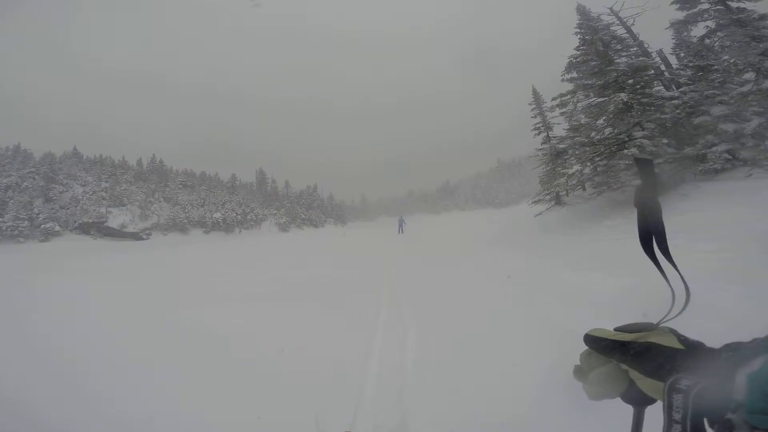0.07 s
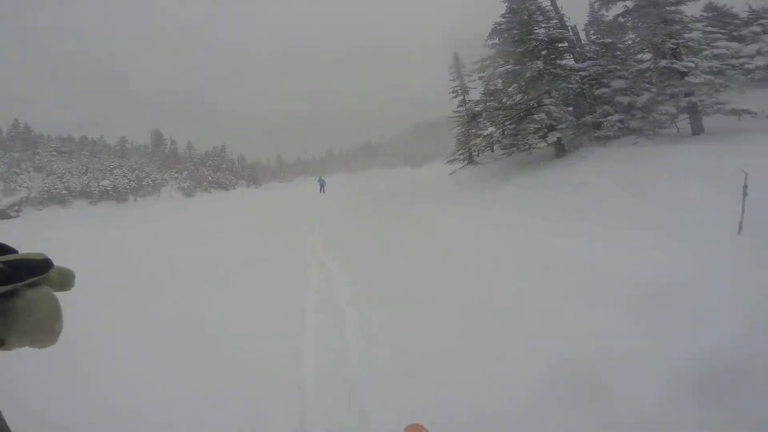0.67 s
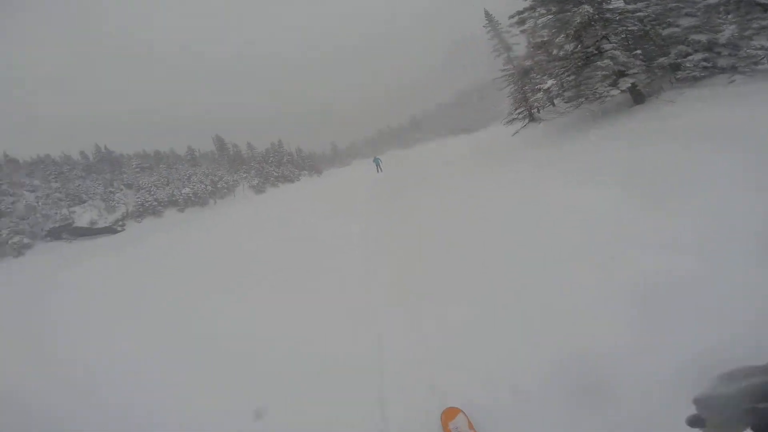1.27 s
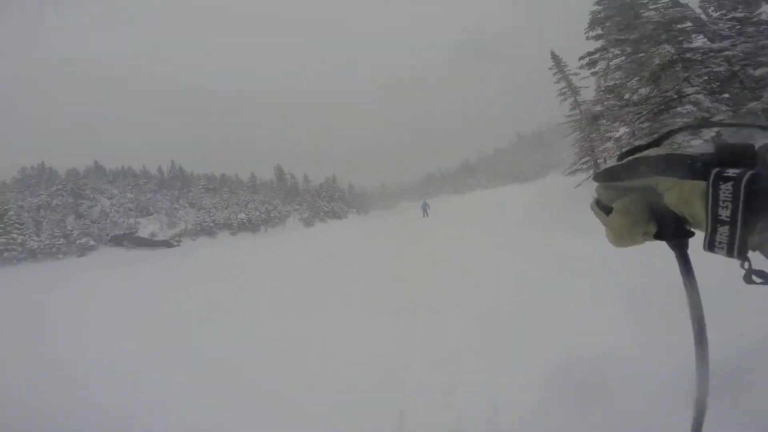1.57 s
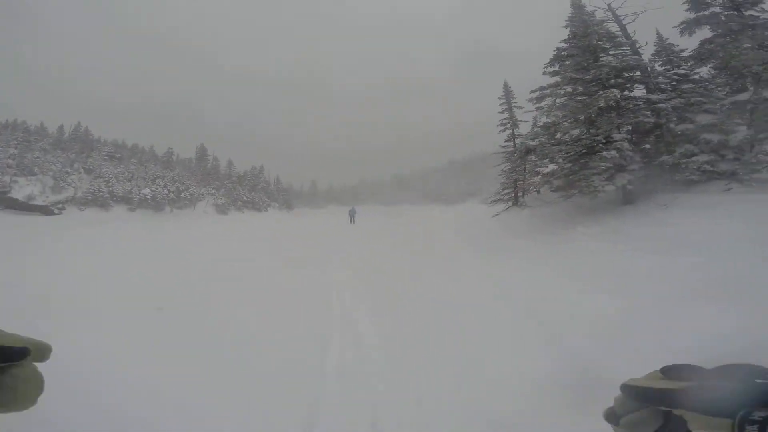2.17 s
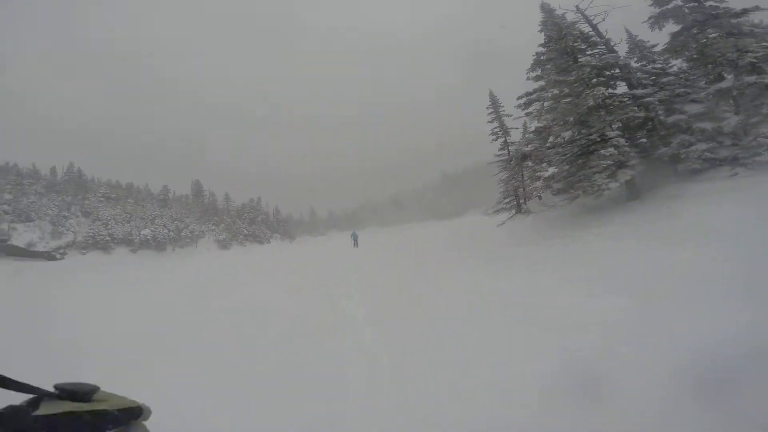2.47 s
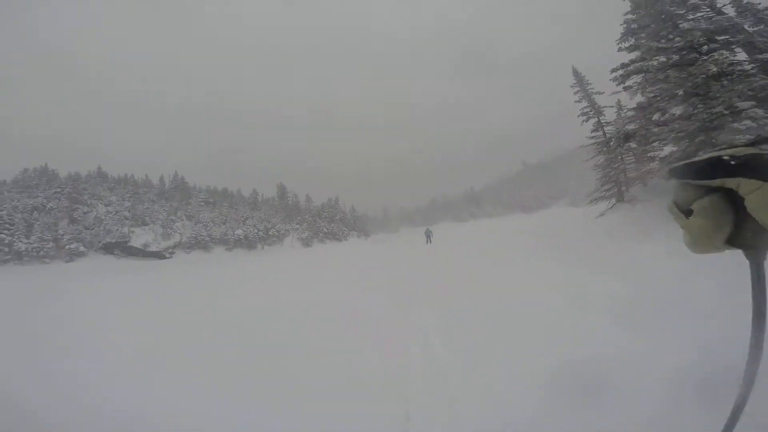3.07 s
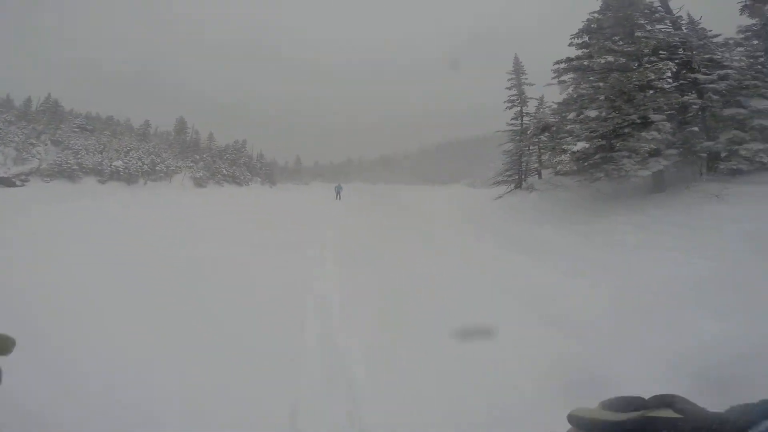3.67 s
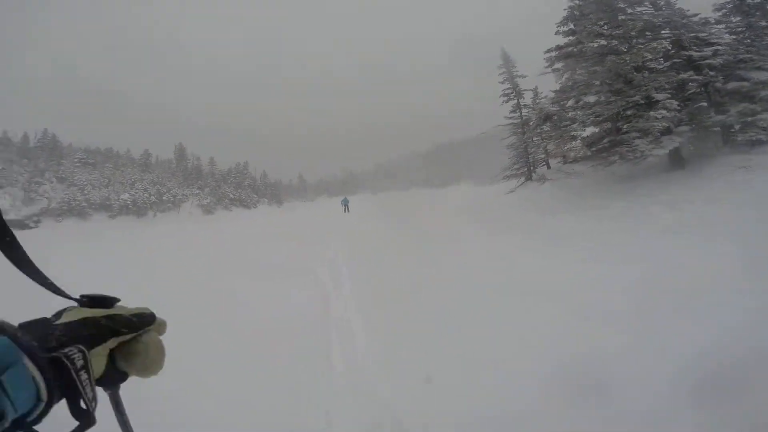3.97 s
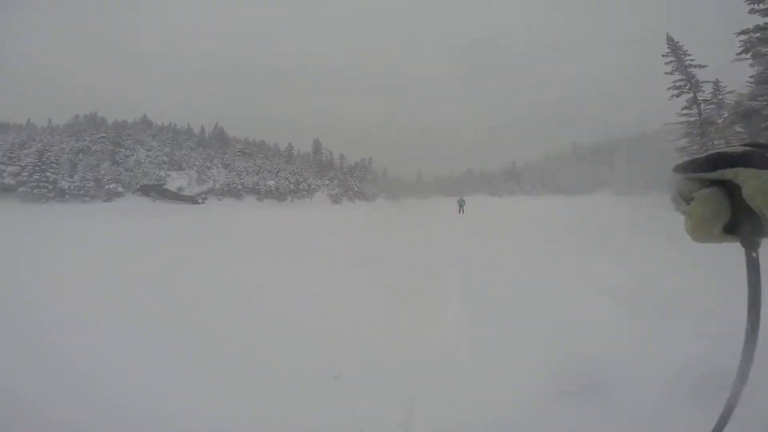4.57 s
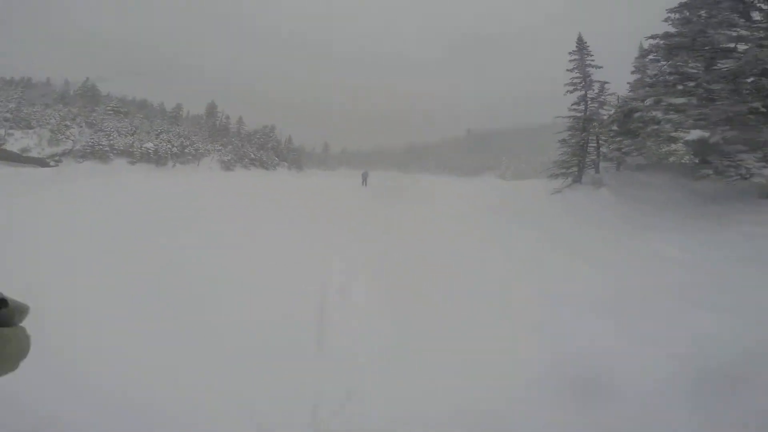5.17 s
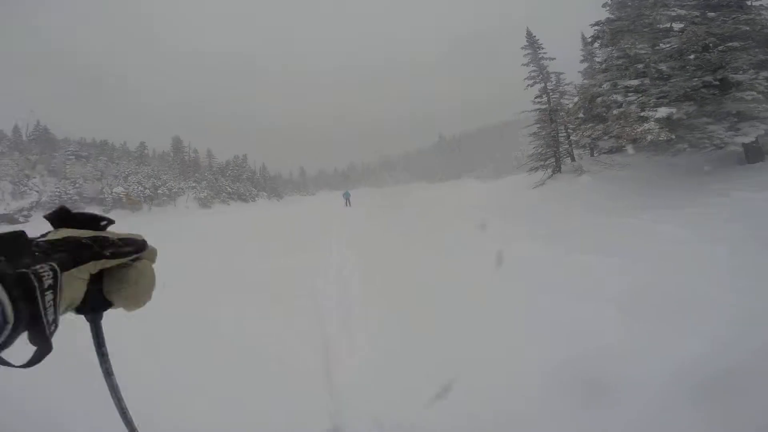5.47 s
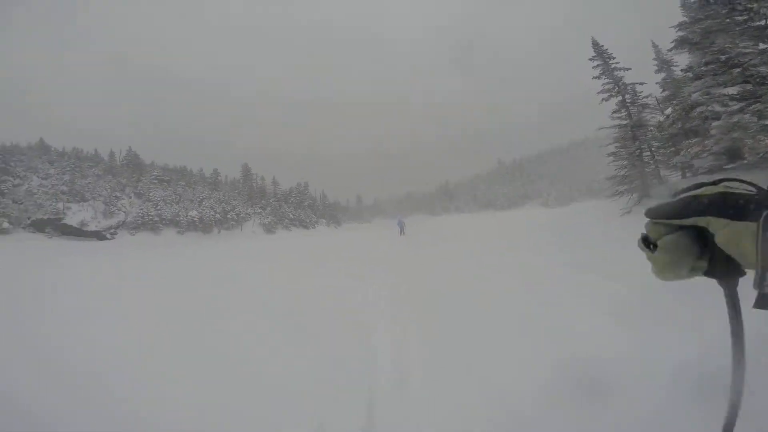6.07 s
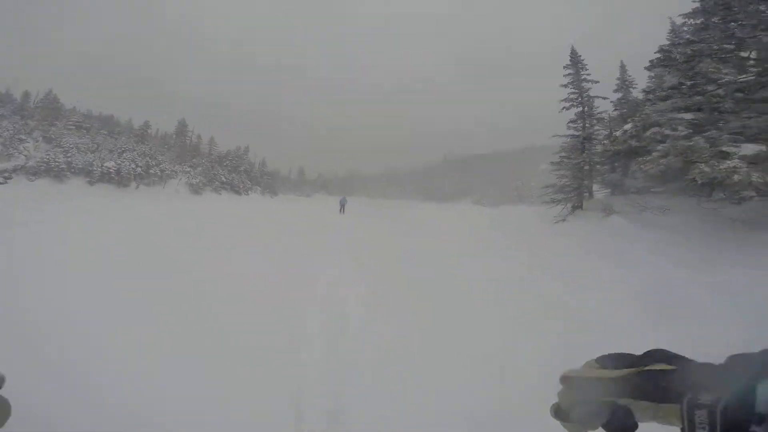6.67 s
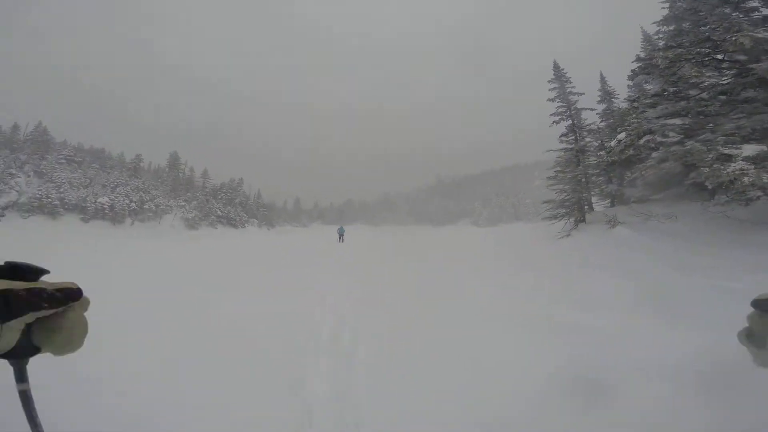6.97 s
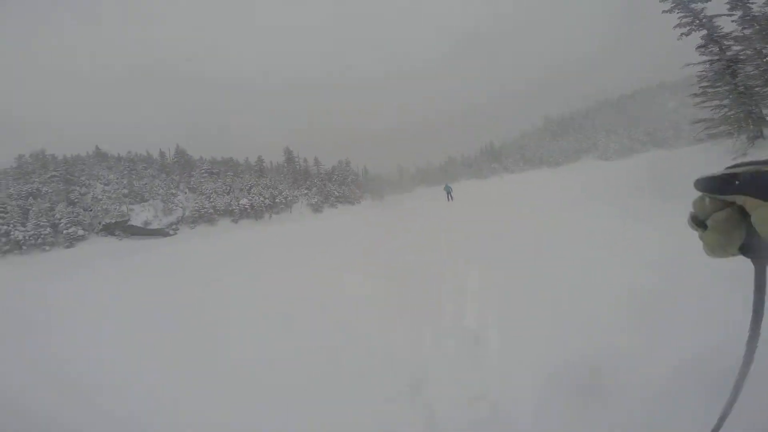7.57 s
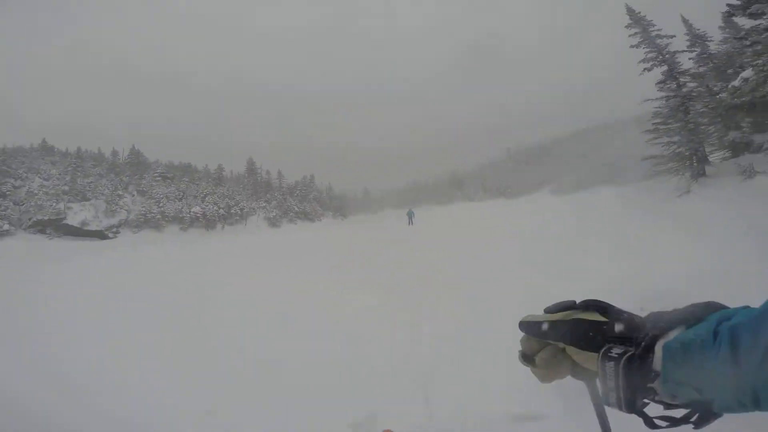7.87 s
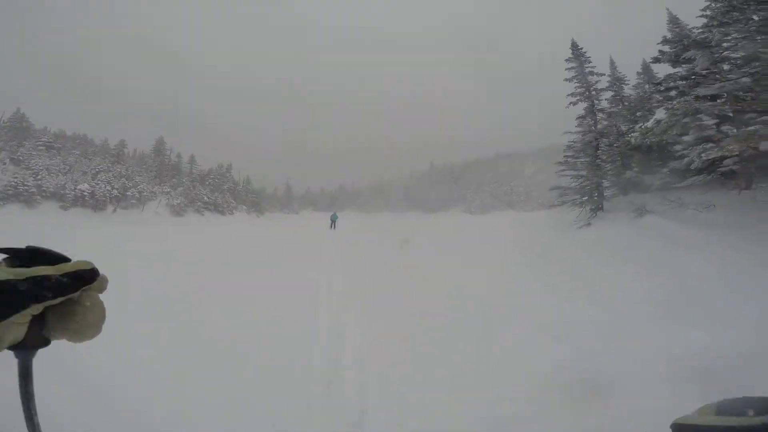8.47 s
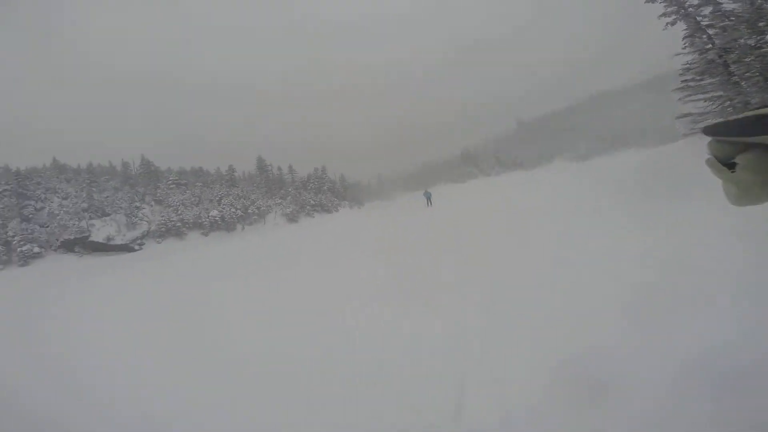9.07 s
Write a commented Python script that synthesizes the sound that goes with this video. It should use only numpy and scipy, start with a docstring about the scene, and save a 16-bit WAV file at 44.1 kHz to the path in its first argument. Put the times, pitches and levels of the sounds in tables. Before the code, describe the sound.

Quiet, rhythmic crunches and scrapes of skis and poles on snow come a little more than once a second, with occasional brief creaks. The microphone sits inside a plastic case on the skier, so gusty low wind and dull bumps from the mount follow the movement. Sharp little ticks of ice and a fine patter of snow hit the shell, growing denser and louder after about halfway.

```python
"""On a snowy slope, a skier strides uphill, heard from a body-worn camera in a closed plastic case.
Each stride loads a ski, crunches the snow and shakes the camera mount; push-offs scrape, packed snow
creaks and a breeze rumbles on the case. Icy flakes tick against the shell and patter in flurries,
more thickly in the second half. Under it all lie a soft hiss of air and a faint electronic whine."""
import sys
import numpy as np
from scipy import signal
from scipy.fft import rfft, irfft, next_fast_len
from scipy.io import wavfile
from scipy.ndimage import uniform_filter1d

SR = 44100
rng = np.random.default_rng(int(sys.argv[2]) if len(sys.argv) > 2 else 0)


def bounce(signal):
    """Save signal as a 16-bit WAV file at the path given by the first command-line argument."""
    frames = np.transpose(np.atleast_2d(signal))
    limited = np.clip(frames, -1, 1)
    pcm = np.round(limited * 32767).astype(np.int16)
    wavfile.write(sys.argv[1], SR, pcm)


N = 411012

# The tones of the mount's soft bounce and of the case's hollow knock: pitch_hz, fade_s, relative_db
BOUNCE_TONES = [(111.6, 0.069, 12.5), (58, 0.05, -15), (150, 0.016, -37)]
KNOCK_TONES = [(312, 0.025, -7), (384, 0.019, 11.5), (762, 0.019, 6.5), (1212, 0.047, -4.5),
               (1850, 0.036, -8)]
# Strides, each loading a ski and shaking the body: start_s, length_s, crunch_db, rumble_db
STRIDES = [(0.04, 0.387, -53.5, -51.5), (0.945, 0.31, -54, -51.5), (1.672, 0.51, -52, -51.5),
           (2.374, 0.41, -57.5, -55), (3.158, 0.46, -51, -51), (3.954, 0.3, -57, -47.5),
           (4.688, 0.38, -49, -48.5), (5.533, 0.17, -48.5, -45.5), (6.102, 0.16, -49, -55),
           (6.358, 0.6, -54, -52.5), (7.025, 0.62, -52.5, -51.5), (7.665, 0.26, -52, -49),
           (8.054, 0.25, -54.5, -50.5), (8.47, 0.33, -53.5, -51), (8.801, 0.19, -54.5, -77),
           (9.18, 0.15, -60.5, -52.5)]
LIGHT_SNOW_DB = -69.5  # strength of the snowfall between flurries


def undb(db):
    """Turn decibels into a number to multiply a sound by."""
    return 10 ** (np.asarray(db) / 20)


def unit(x):
    """Scale a signal to an average (rms) level of 1."""
    return x / np.sqrt(np.mean(x ** 2) + 1e-20)


def even(x, span_s):
    """Hold the level near 1 over each span_s, keeping the quicker flickers."""
    return x / np.sqrt(np.abs(uniform_filter1d(x ** 2, int(span_s * SR))) + 1e-20)


def curve(rows):
    """Join (time_s, value) points with straight lines."""
    return np.interp(np.arange(N) / SR, *np.transpose(rows))


def swell(start_s, hold_s, rise_s, fall_s):
    """A gain that rises to 1 by start_s, holds and falls."""
    return curve([(start_s - rise_s, 0), (start_s, 1), (start_s + hold_s, 1),
                  (start_s + hold_s + fall_s, 0)])


def wander(per_s):
    """A random drift of about 1 either way, heading for per_s new values a second."""
    targets = rng.standard_normal(8192)
    return unit(np.interp(np.arange(N) / SR * per_s, np.arange(len(targets)), targets))


def colour(x, outline):
    """Shape bass and treble to a (pitch_hz, relative_db) outline; clicks keep their sharp start."""
    size = next_fast_len(N + 8192, True)
    hz, db = np.transpose(outline)
    bin_hz = np.maximum(np.arange(size // 2 + 1) * SR / size, 1)
    gains = undb(np.interp(np.log(bin_hz), np.log(hz), db))
    cepstrum = irfft(np.log(gains), size)
    # fold the filter so that nothing rings ahead of a click
    cepstrum[1:size // 2] *= 2
    cepstrum[size // 2 + 1:] = 0
    return irfft(rfft(x, size) * np.exp(rfft(cepstrum)), size)[:N]


def fade(t, fade_s):
    """Die away by 60 dB in fade_s seconds."""
    return np.exp(-np.log(1000) * t / fade_s)


def ring(t, hz, fade_s):
    """One tone that dies away after a hit."""
    return np.sin(2 * np.pi * hz * t) * fade(t, fade_s)


def struck(t, tones, retune=1):
    """A struck object rings with all its tones at once."""
    return sum(undb(db) * ring(t, hz * retune, fade_s) for hz, fade_s, db in tones)


def rough_hit(t, roughness, fade_s):
    """One sharp push with a dying tail of noise."""
    return (t == 0) + roughness * rng.standard_normal(len(t)) * fade(t, fade_s)


def at_level(sound, db, first_s=0.005):
    """Scale a short sound so that its opening has the given level."""
    return sound / sound[:int(first_s * SR)].std() * undb(db)


def add(out, start_s, sound):
    """Mix a sound in at start_s."""
    i = max(int(start_s * SR), 0)
    out[i:i + len(sound)] += sound[:max(N - i, 0)]


def grains(per_s, spread_db, cap):
    """Random clicks, many small and a few large, spanning spread_db times cap in size."""
    hit = rng.random(N) < per_s / SR
    size = undb(spread_db * np.minimum(rng.exponential(size=N), cap))
    return unit(hit * size * rng.choice([-1, 1], N) / np.sqrt(per_s))


def through_case(x, share):
    """The plastic case rings along with a sound passing through it."""
    # Where the case rings: pitch_hz, width_hz, relative_db
    case_tones = [(802, 112, 4.5), (1233, 90, 3), (1680, 73, 1), (1920, 130, -3), (2360, 48, 3),
                  (2870, 890, 1), (3690, 140, 3.5), (5300, 540, -11)]
    ringing = sum(undb(db) * signal.lfilter(*signal.iirpeak(hz, hz / width_hz, SR), x)
                  for hz, width_hz, db in case_tones)
    return x + share * ringing


def ski_pressure(glide_db=-57, uneven_db=1.3):
    """How loud the crunch is: a light glide, each stride's weight and the push-offs, on uneven snow."""
    # A ski or pole scrapes harder until it lets go: peak_s, rise_s, level_db
    push_offs = [(0.1, 0.015, -46), (0.23, 0.096, -42.5), (0.67, 0.073, -49), (1.1, 0.024, -49),
                 (1.22, 0.072, -55), (1.52, 0.14, -58), (1.82, 0.032, -45), (2.03, 0.14, -49),
                 (2.6, 0.056, -49), (2.701, 0.058, -38), (3.27, 0.04, -49), (3.36, 0.036, -45),
                 (3.48, 0.046, -44), (4.14, 0.041, -44.5), (4.23, 0.23, -46.5), (4.58, 0.1, -51),
                 (5.33, 0.044, -58), (5.84, 0.1, -55), (5.999, 0.087, -47), (6.43, 0.06, -43),
                 (6.6, 0.044, -44), (6.7, 0.03, -47.5), (7.281, 0.1, -41), (7.401, 0.017, -36.5),
                 (7.59, 0.04, -45.5), (7.75, 0.021, -38), (7.96, 0.13, -45.5), (8.06, 0.045, -47.5),
                 (8.19, 0.036, -43.5), (8.48, 0.033, -61), (8.66, 0.04, -46), (8.81, 0.04, -52)]
    power = undb(glide_db) ** 2
    for start_s, length_s, db, _ in STRIDES:
        power += (undb(db) * swell(start_s, length_s, rise_s=0.089, fall_s=0.026)) ** 2
    for peak_s, rise_s, db in push_offs:
        power += (undb(db) * swell(peak_s, 0, rise_s, fall_s=0.058)) ** 2
    return np.sqrt(power) * undb(uneven_db * wander(per_s=14))


def snow_crunch(grains_per_s=2200, slips_per_s=48, gain_db=-0.04):
    """Snow gives way in sudden slips, each a dying spray of crystals, over the smooth rub of the ski."""
    dying = fade(np.arange(SR // 20) / SR, fade_s=0.035)
    # The tone of crushed snow: pitch_hz, relative_db
    snow_outline = [(300, -7.5), (600, -4), (1020, -8), (1400, -1), (1900, 2), (2500, -1), (3300, -10),
                    (4100, -11.5), (4800, -21.5), (7000, -23), (15000, -42.5)]
    sprays = 0
    for hz in (1300, 1820, 2600, 3300):
        slips = signal.fftconvolve(np.abs(grains(slips_per_s, spread_db=6, cap=2.73)), dying)[:N]
        sprays += signal.lfilter(*signal.iirpeak(hz, 2, SR), slips * rng.standard_normal(N))
    breaking = grains(grains_per_s, spread_db=3, cap=5.9)
    rub = 0.42 * rng.standard_normal(N)
    snow = unit(colour(breaking + rub, snow_outline)) + unit(colour(sprays, snow_outline))
    return even(through_case(snow, share=1), span_s=0.24) * ski_pressure() * undb(gain_db)


def snowfall_db(patchy_db=1.24):
    """How strongly it snows: a thin, patchy fall with flurries on top."""
    # Flurries of fine snow reaching the case: start_s, length_s, strength_db
    flurries = [(1.478, 0.08, -65), (1.921, 0.12, -62), (3.329, 0.2, -65.5), (4.795, 0.3, -55.5),
                (5.663, 0.034, -59), (5.961, 0.05, -62), (6.079, 0.054, -59), (6.476, 0.35, -58.5),
                (6.888, 0.18, -64.5), (7.26, 0.1, -50), (7.388, 0.07, -47.5), (7.519, 0.13, -50),
                (7.73, 0.06, -47.5), (7.926, 0.33, -56.5), (8.358, 0.14, -57), (8.649, 0.16, -58.5),
                (8.97, 0.12, -58.5)]
    power = undb(LIGHT_SNOW_DB) ** 2
    for start_s, length_s, db in flurries:
        power += (undb(db) * swell(start_s, length_s, rise_s=0.06, fall_s=0.07)) ** 2
    return 10 * np.log10(power) + patchy_db * wander(per_s=12)


def flake_patter(base_per_s=55, base_db=-72, thicken=0.52, vary_db=26, gain_db=2):
    """Small flakes patter on the case over a hiss of powder; thicker snow is denser and louder."""
    # The tone of the patter: pitch_hz, relative_db
    patter_outline = [(700, -10), (1500, 1), (2700, 8), (4200, 9.5), (5400, 2), (6500, 6.5), (8600, 5.5),
                      (11000, 1), (13000, 0.5), (15000, -4)]
    strength_db = snowfall_db()
    flakes_per_s = base_per_s * undb(thicken * (strength_db - base_db))
    flakes = np.abs(grains(flakes_per_s, spread_db=2, cap=3.5))
    dying = fade(np.arange(SR // 100) / SR, fade_s=0.0089)
    patter = 0
    for hz in (2900, 4200, 4980, 7540, 11450, 12600):
        # each flake shatters with its own mix of pitches
        bursts = signal.fftconvolve(flakes * undb(-vary_db * rng.random(N)), dying)[:N]
        patter += signal.lfilter(*signal.iirpeak(hz, hz / 1900, SR), bursts * rng.standard_normal(N))
    powder = 0.46 * rng.standard_normal(N)
    snow = colour(unit(patter) + powder, patter_outline)
    return unit(through_case(snow, share=0.1)) * undb(strength_db + gain_db)


def rumble_strength(settle_db=6.5, gust_db=1.8):
    """How loud the rumble is: the body shakes as a stride begins, then settles, over a gusty breeze."""
    # The breeze on the case: time_s, strength_db
    breeze = [(0, -65), (0.55, -54), (0.8, -53.5), (1.3, -61), (1.55, -56), (2.2, -62), (3.0, -58.5),
              (3.75, -57), (4.5, -54.5), (5.8, -55.5), (6.3, -51.5), (8.3, -53), (9.32, -53)]
    power = undb(curve(breeze)) ** 2
    for start_s, length_s, _, db in STRIDES:
        easing_db = curve([(start_s, settle_db / 2), (start_s + length_s, -settle_db / 2)])
        shake = swell(start_s, 0.82 * length_s, rise_s=0.07, fall_s=0.1)
        power += (undb(db + easing_db) * shake) ** 2
    return np.sqrt(power) * undb(gust_db * wander(per_s=9))


def wind_and_body_rumble(bumps_per_s=45, hollow_db=-5, gain_db=-1):
    """Air buffets the case, and the moving body shakes the mount in many small bumps."""
    # The deep tone of wind on the case: pitch_hz, relative_db
    wind_outline = [(12, -34), (22, 5.5), (45, -8), (75, -1.5), (115, -4), (165, -8), (240, -11),
                    (370, -13.5), (540, -21), (800, -28.5), (1500, -51.5)]
    t = np.arange(SR // 8) / SR
    mount = struck(t, BOUNCE_TONES) + undb(hollow_db) * struck(t, KNOCK_TONES)
    bumps = signal.fftconvolve(grains(bumps_per_s, spread_db=9, cap=2.63), mount)[:N]
    wind = through_case(colour(rng.standard_normal(N), wind_outline), share=0.67)
    return even(unit(wind) + unit(bumps), span_s=0.11) * rumble_strength() * undb(gain_db)


def soft_air(level_db=-62):
    """A faint breeze sways a low murmur and a thin hiss."""
    # The tone of the air: pitch_hz, relative_db
    air_outline = [(12, -17), (25, 13.5), (60, 17.5), (130, 6.5), (250, -7), (1000, 1), (2000, -1.5),
                   (4000, -4), (6000, -8), (11000, -16.5), (15000, -14)]
    return unit(colour(rng.standard_normal(N), air_outline)) * undb(level_db + wander(per_s=6.4))


def camera_whine(pitch_hz=14625, level_db=-83):
    """The camera's electronics give one very soft, high tone."""
    return undb(level_db) * np.sin(2 * np.pi * pitch_hz * np.arange(N) / SR)


def small_ice_grains(count=30, wall_hz=2400, base_db=(-54, -65, -65), spread_db=2):
    """Rows of faint random hits for ice_ticks, more frequent and harder where the snow is thick."""
    lift_db = 0.56 * (snowfall_db() - LIGHT_SNOW_DB)
    fallen = np.cumsum(undb(lift_db))
    starts = np.searchsorted(fallen, fallen[-1] * rng.random(count))
    chance = rng.standard_normal((count, 4))
    pitches_hz = wall_hz * np.exp(0.36 * chance[:, 0])
    levels_db = np.array(base_db) + lift_db[starts, None] + spread_db * chance[:, 1:]
    return np.column_stack([starts / SR, pitches_hz, levels_db]).tolist()


def ice_ticks(shell_hz=5250, hollow_db=-34, wall_gain_db=-1):
    """An ice grain cracks and crumbles on the case; the wall it hits and the stiff shell ring briefly."""
    # The larger grains: start_s, wall_pitch_hz, wall_db, shell_db, crack_db
    large_grains = [(0.039, 2300, -46, -61, -61), (0.32, 2100, -60, -61, -58), (0.517, 2400, -60, -64, -59),
                    (1.0042, 1920, -44, -67, -62), (1.3135, 2290, -48, -53, -60),
                    (1.3235, 2720, -52, -52, -48.5), (1.3505, 1920, -42.5, -50, -47),
                    (1.4701, 2060, -49, -53, -47), (1.6414, 2220, -66, -56, -52),
                    (1.9186, 2096, -42.5, -52, -51), (1.9463, 2190, -44.5, -42, -45),
                    (2.0265, 2200, -45, -52, -45), (2.0425, 2170, -60, -56, -43),
                    (2.0905, 2300, -62, -58, -52), (2.1444, 2080, -55, -54, -54),
                    (2.353, 2400, -49, -61, -58), (2.3684, 2580, -42, -39.5, -66),
                    (2.4674, 2460, -47, -42.5, -70), (2.8503, 1870, -49, -56, -49),
                    (2.948, 3500, -36.5, -45, -62), (3.0387, 2600, -52, -56, -57),
                    (3.119, 2090, -56, -54, -59), (3.2417, 2260, -43.5, -69, -61),
                    (3.342, 1800, -40, -51, -51), (3.3725, 2200, -65, -50, -54),
                    (3.7543, 2890, -61, -58, -50), (4.296, 2630, -68, -58, -58),
                    (4.4709, 2430, -44, -59, -83), (4.6033, 2370, -40, -56, -59),
                    (4.667, 1800, -56, -44, -44), (4.6967, 2540, -44, -55, -49),
                    (4.8843, 2630, -35, -40.5, -42.5), (4.9972, 2650, -60, -43, -40.5),
                    (5.0443, 2300, -38.5, -44, -41.5), (5.065, 2330, -45, -41.5, -46),
                    (5.0987, 2750, -43, -47, -44.5), (5.3487, 2600, -44.5, -54, -47),
                    (5.6126, 2600, -38, -49, -45), (5.725, 2340, -39.5, -38, -57),
                    (5.7353, 2670, -37, -41, -42.5), (5.8583, 2430, -44, -48, -46.5),
                    (5.9477, 2640, -41.5, -53, -50), (6.0634, 2770, -43, -50, -45),
                    (6.0895, 2000, -42.5, -55, -45), (6.1098, 2770, -44.5, -53, -47),
                    (6.2443, 2220, -25.5, -47, -42), (6.4914, 3100, -39, -48, -49),
                    (6.5536, 2820, -40, -49, -45.5), (6.6135, 2090, -32, -33.5, -37),
                    (6.654, 2780, -37, -55, -55), (6.6729, 2240, -41, -47, -42.5),
                    (6.8184, 2570, -42, -50, -50), (7.1643, 2650, -35.5, -36, -39),
                    (7.2123, 2510, -39, -47, -47.5), (7.2689, 2480, -38, -48, -66),
                    (7.2965, 2570, -46, -42.5, -66), (7.3736, 2040, -34.5, -60, -65),
                    (7.3879, 2000, -39, -48, -51), (7.4018, 2570, -30, -46, -52),
                    (7.5331, 2840, -31.5, -44, -45), (7.5425, 2680, -38, -50, -53),
                    (7.549, 2080, -37.5, -49, -57), (7.6637, 2160, -43.5, -60, -57),
                    (7.7105, 2340, -41, -49.5, -54), (7.7504, 2120, -43, -51, -45.5),
                    (7.8545, 2460, -41, -46, -41.5), (8.089, 2980, -42.5, -50.5, -55),
                    (8.112, 1850, -38, -54, -51), (8.1699, 2590, -38, -46, -46),
                    (8.2106, 2760, -28.5, -26, -31), (8.2834, 2770, -41, -38.5, -65),
                    (8.372, 1690, -36.5, -60, -45.5), (8.4551, 2700, -45, -54, -49),
                    (8.4734, 1721, -40.5, -53, -57), (8.493, 2524, -37.5, -49, -49),
                    (8.5132, 2600, -39, -34.5, -58), (8.5606, 2360, -43, -46, -54),
                    (8.8353, 2630, -39.5, -37, -40), (8.8838, 1810, -39, -47.5, -48),
                    (9.0197, 2800, -47.5, -50, -67), (9.0716, 2600, -43.5, -65, -74),
                    (9.1504, 2680, -46.5, -49, -48)]
    out, t = np.zeros(N), np.arange(SR // 25) / SR
    crack_band = signal.butter(2, [7000, 12000], "band", fs=SR, output="sos")
    wall_band = signal.butter(2, [1000, 4400], "band", fs=SR, output="sos")
    for start_s, wall_hz, wall_db, shell_db, crack_db in list(large_grains) + small_ice_grains():
        crumble = rough_hit(t, roughness=0.16, fade_s=0.011)
        wall_ring = ring(t, wall_hz, fade_s=0.0044) + undb(hollow_db) * struck(t, KNOCK_TONES)
        wall = signal.sosfilt(wall_band, signal.fftconvolve(crumble, wall_ring)[:len(t)])
        shell_ring = ring(t, shell_hz * (1 + 0.027 * rng.standard_normal()), fade_s=0.0035)
        shell = np.diff(signal.fftconvolve(crumble, shell_ring)[:len(t)], prepend=0)  # thins the bass
        crack = signal.sosfilt(crack_band, rng.standard_normal(len(t)) * fade(t, fade_s=0.0019))
        add(out, start_s, at_level(wall, wall_db + wall_gain_db))
        add(out, start_s, at_level(shell, shell_db) + at_level(crack, crack_db))
    return through_case(out, share=0.74)


def mount_jolts(thud_gain_db=-1, knock_gain_db=6):
    """A jolt bounces the camera on its mount and knocks the case, with a short rattle."""
    # The harder jolts: start_s, bounce_hz, thud_db, knock_db
    jolts = [(0.129, 61.5, -39, -57.5), (0.175, 107, -36, -59), (0.313, 95, -49, -50.5),
             (0.367, 120, -40, -57), (0.426, 116, -42.5, -55), (0.737, 128, -37.5, -57),
             (0.942, 106, -52, -56.5), (1.001, 100, -48, -55.5), (1.039, 107, -41, -51),
             (1.733, 100, -42, -64), (1.928, 106, -43.5, -57), (1.975, 122, -37.5, -57.5),
             (2.234, 108, -67, -55.5), (2.308, 113.4, -42, -59), (2.454, 98, -51, -51.5),
             (2.475, 97, -39.5, -54), (2.54, 121, -41, -54), (2.592, 83, -46, -59), (2.664, 106, -48, -57),
             (3.137, 105, -48, -59.5), (3.312, 94, -39, -50), (3.377, 114, -44, -51),
             (3.9, 111, -43.5, -59), (3.95, 106, -38, -57), (4.017, 112, -40.5, -45),
             (4.125, 101, -39, -53), (4.719, 102, -44, -53), (4.791, 76, -39.5, -64),
             (4.886, 88, -41.5, -57), (5.343, 102, -42.5, -63), (5.544, 106, -43, -57),
             (5.592, 130, -45, -52.5), (5.655, 123, -38, -57.5), (6.093, 96, -43, -54.5),
             (6.246, 88, -45.5, -52.5), (6.359, 103, -43.5, -62.5), (6.457, 88, -43, -57),
             (6.855, 77.2, -44.5, -63), (7.046, 105, -33, -54), (7.078, 116, -46, -52.5),
             (7.161, 84, -44, -59), (7.314, 91, -42.5, -57), (7.856, 116, -40, -77), (8.041, 104, -39, -69),
             (8.186, 124, -43, -68), (8.595, 110, -45, -56), (8.65, 110, -46, -58), (8.71, 104, -45, -52.5),
             (9.274, 84, -45, -66)]
    out, t = np.zeros(N), np.arange(SR // 8) / SR
    for start_s, bounce_hz, thud_db, knock_db in jolts:
        thud = -struck(t, BOUNCE_TONES, retune=bounce_hz / BOUNCE_TONES[0][0])
        rattle = rough_hit(t, roughness=0.17, fade_s=0.024)
        knock = signal.fftconvolve(rattle, struck(t, KNOCK_TONES))[:len(t)]
        add(out, start_s, at_level(thud, thud_db + thud_gain_db, first_s=0.02))
        add(out, start_s, at_level(knock, knock_db + knock_gain_db, first_s=0.02))
    return out


def snow_creaks(gain_db=-1):
    """Packed snow gives way in a short run of slips that keep one pitch ringing."""
    # Short creaks: start_s, pitch_hz, strength_db
    creaks = [(0.424, 2050, -40.5), (1.0923, 1830, -38), (1.6835, 2170, -40), (2.0215, 2190, -40),
              (2.1155, 1530, -35), (3.312, 2100, -42), (4.0231, 1580, -41), (4.427, 2000, -45),
              (4.6874, 1550, -39), (5.0095, 1960, -34.5), (6.237, 2150, -33), (6.587, 2030, -30),
              (6.695, 1990, -35), (6.8533, 2020, -40), (7.109, 1790, -33.5), (7.2762, 1980, -28.5),
              (7.32, 2170, -34.5), (7.5883, 2050, -36.5), (8.481, 2400, -38)]
    out, t = np.zeros(N), np.arange(SR // 25) / SR
    creak_band = signal.butter(2, [1200, 3200], "band", fs=SR, output="sos")
    for start_s, hz, db in creaks:
        slips = rough_hit(t, roughness=0.38, fade_s=0.026)
        ringing = signal.fftconvolve(slips, ring(t, hz, fade_s=0.006))[:len(t)]
        add(out, start_s, at_level(signal.sosfilt(creak_band, ringing), db + gain_db))
    return through_case(out, share=0.077)


def scene():
    """All the sounds meet in one microphone."""
    ongoing = snow_crunch() + flake_patter() + wind_and_body_rumble() + soft_air() + camera_whine()
    return (ongoing + ice_ticks() + mount_jolts() + snow_creaks())[None]


def record(dry):
    """The camera cuts the highest treble, above 15400 Hz."""
    return signal.sosfilt(signal.ellip(8, .2, 70, 15400, fs=SR, output="sos"), dry)


dry = scene()
out = record(dry)
bounce(out)
```